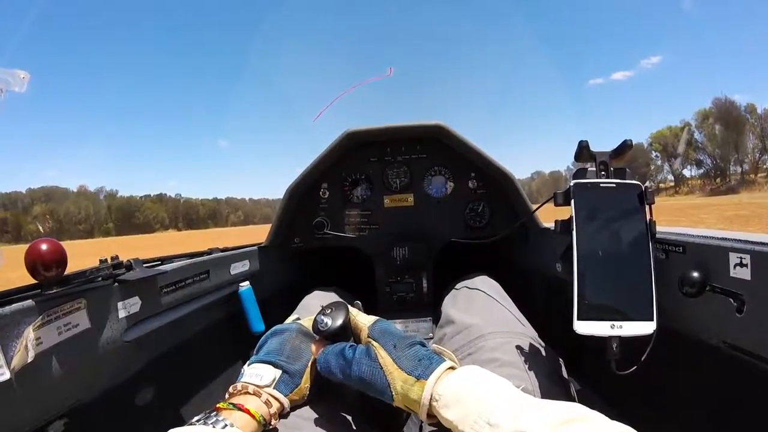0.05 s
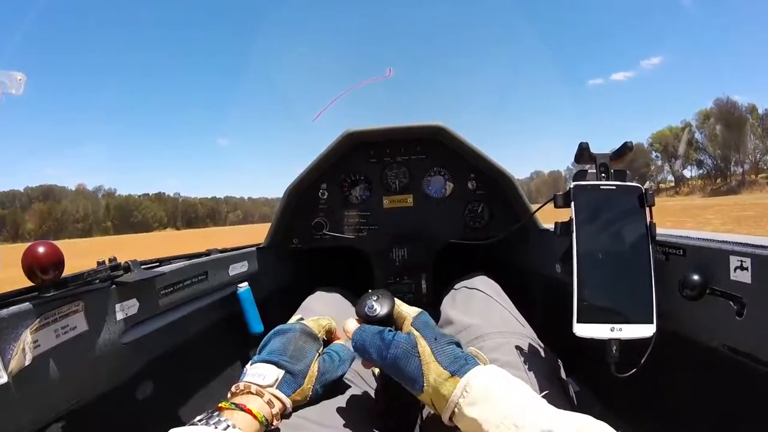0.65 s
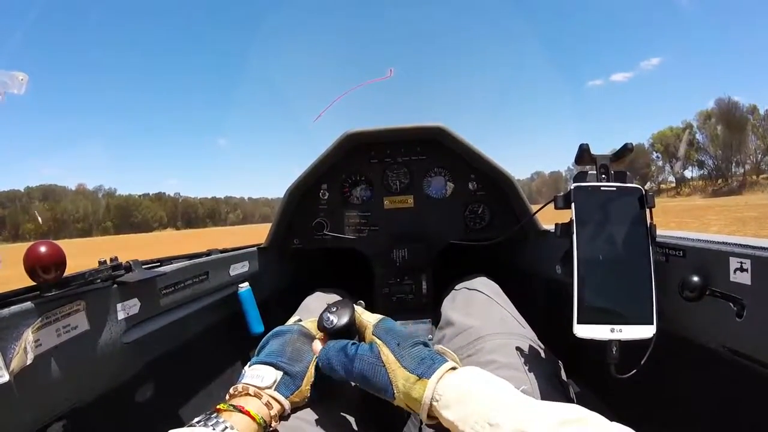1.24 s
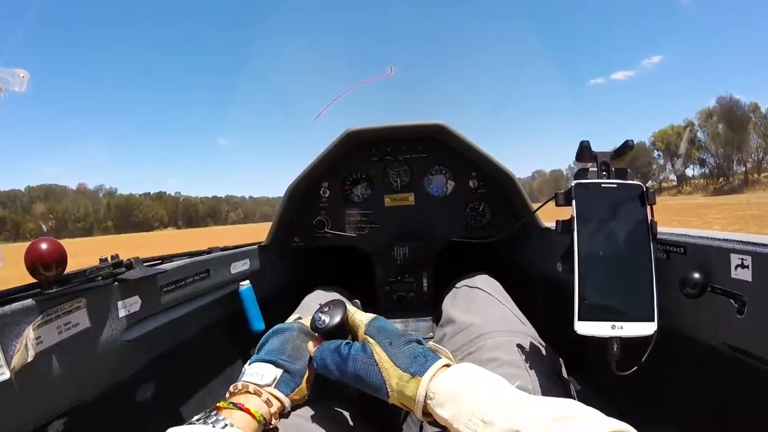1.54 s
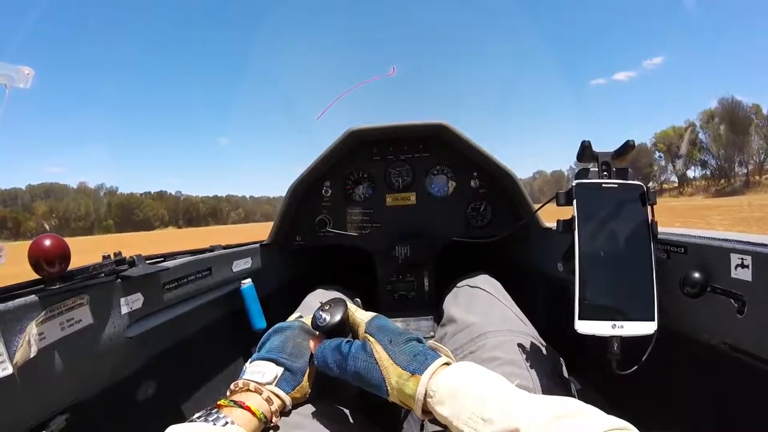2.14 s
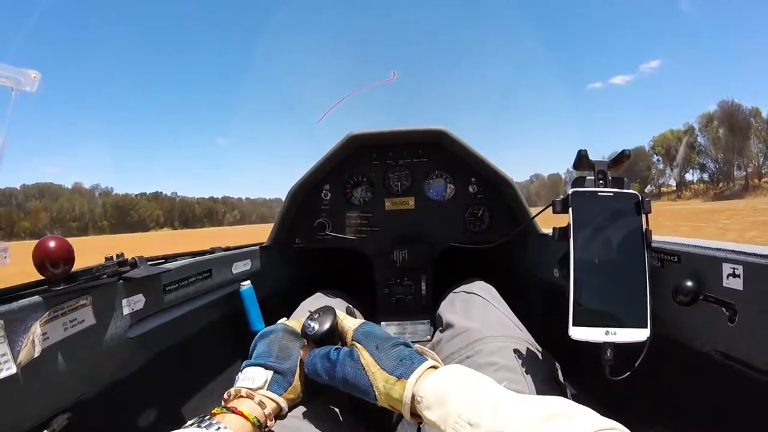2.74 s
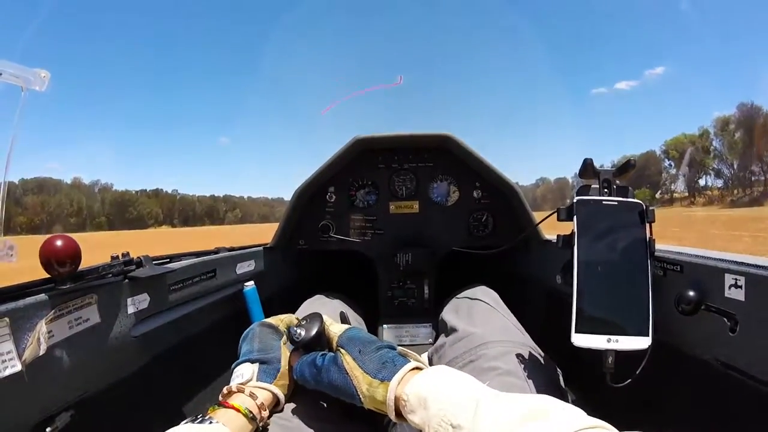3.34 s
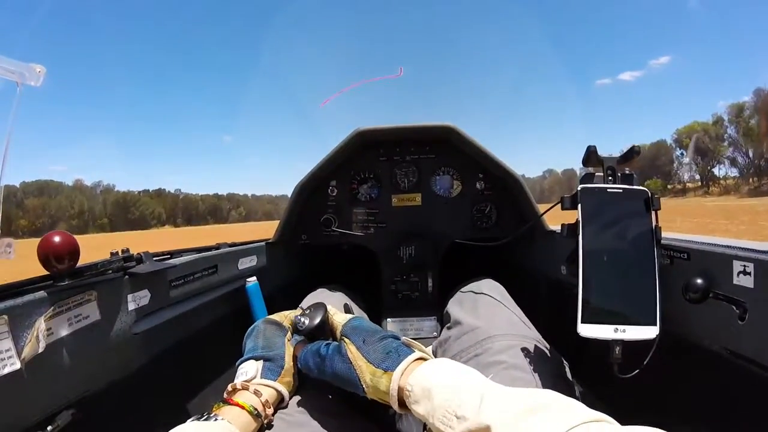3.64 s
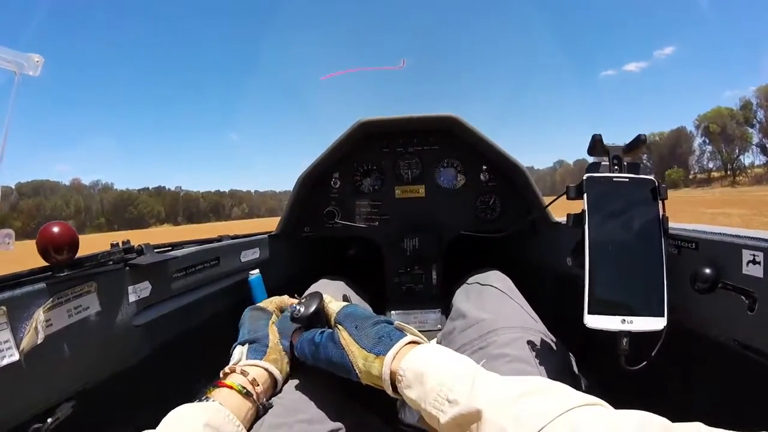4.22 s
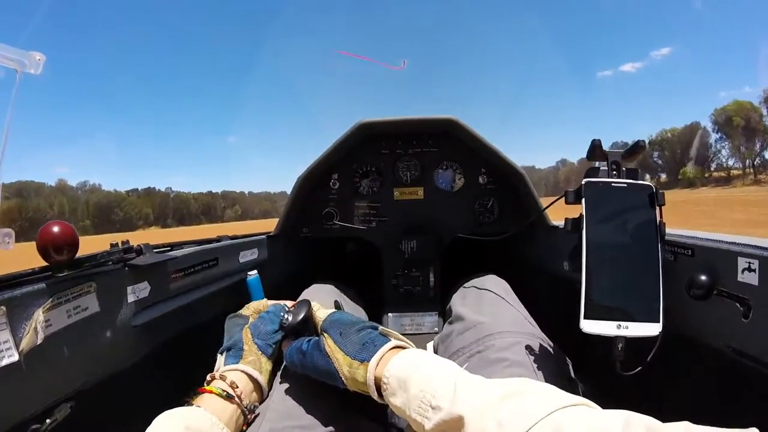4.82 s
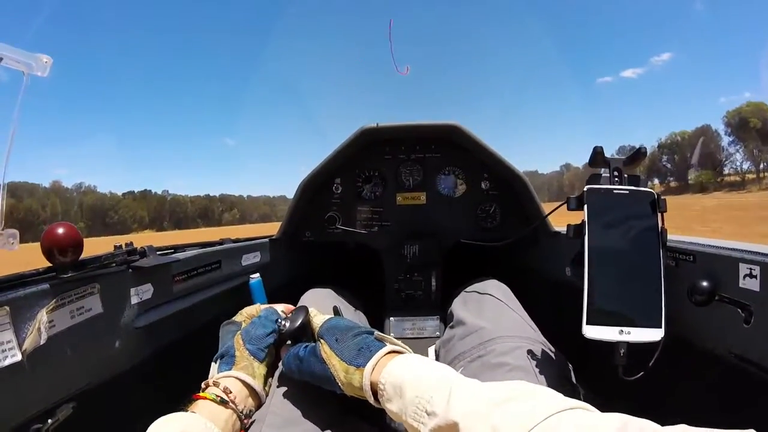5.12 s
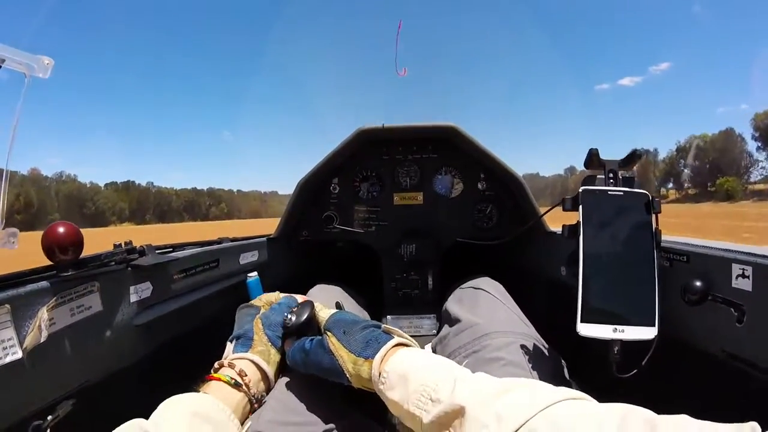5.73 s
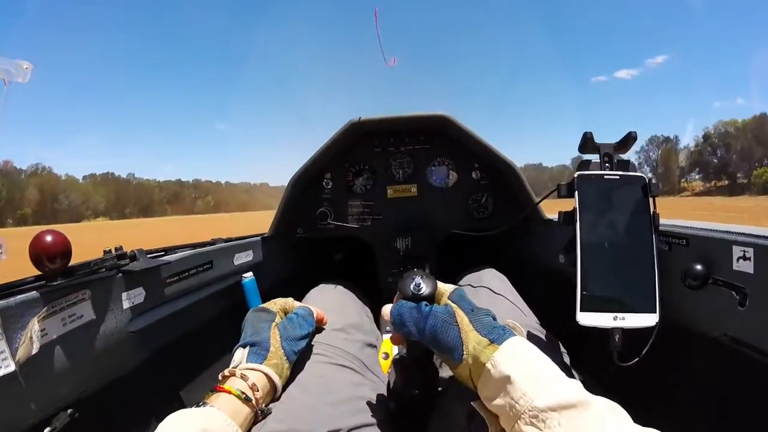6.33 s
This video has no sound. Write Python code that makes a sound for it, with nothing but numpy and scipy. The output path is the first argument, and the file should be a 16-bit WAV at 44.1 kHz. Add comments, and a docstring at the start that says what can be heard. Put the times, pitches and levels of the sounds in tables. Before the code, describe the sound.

Inside a glider's closed cockpit, soft thumps give way to hard knocks and a bumpy, booming roll across stubble.

```python
"""Soft thumps and creaks come first: a glider creeps over dry grass, heard inside its closed cockpit.
Its frame knocks sharply as it is pulled away for launch. Bumps under the wheel make the hollow body
boom ever louder, the stubble roars and rasps under the tyre, and loose fittings rattle and tick.
Behind it all are a breeze on the canopy, a soft hiss and a faint electronic whine."""
import sys
import numpy as np
from scipy import signal
from scipy.fft import rfft, irfft
from scipy.io import wavfile
from scipy.ndimage import uniform_filter1d

SR = 44100
rng = np.random.default_rng(int(sys.argv[2]) if len(sys.argv) > 2 else 0)


def unload_wav(signal):
    """Save mono or channel-first audio to the path in sys.argv[1] as 16-bit WAV at rate SR, clipped to [-1, 1]."""
    wavfile.write(
        sys.argv[1],
        SR,
        np.round(np.clip(np.atleast_2d(signal).T, -1, 1) * 32767).astype(np.int16),
    )


N = 285327
TIME = np.arange(N) / SR

# skips, where the wheel runs light and the roar drops: time_s, change_db
SKIPS = [(2.72, -3), (3.2, -6.5), (3.3, -4), (3.8, -3), (3.965, -4.5), (4.095, -6.5), (4.35, -4),
         (4.48, -2), (4.61, -3), (4.79, -4.5), (4.915, -4.5), (5.14, -4.5), (5.315, -5), (5.9, -3),
         (6.14, -4.5)]


def gain_of(db):
    """Turns decibels into a number to multiply a sound by."""
    return 10 ** (np.asarray(db) / 20)


def evened(x):
    """Scales a sound so that its average strength (rms) is 1."""
    return x / np.sqrt(np.mean(x ** 2) + 1e-20)


def steadied(x, size):
    """Holds a sound's strength near 1 over every stretch of size samples."""
    power = uniform_filter1d(uniform_filter1d(x ** 2, size), size)
    return x / np.sqrt(abs(power) + 1e-20)


def db_at(spectrum, hz):
    """Looks up levels between the (pitch_hz, level_db) points of a spectrum."""
    pitch_hz, level_db = np.transpose(spectrum)
    return np.interp(np.log(hz + 1), np.log(pitch_hz + 1), level_db)


def level(curve):
    """Joins (time_s, level_db) points into a level for every sample."""
    return np.interp(TIME, *np.transpose(curve))


def swells(events, half_s, column):
    """Turns one column of a table into smooth humps or dips around each row's time."""
    return sum(row[column] * np.exp(-((TIME - row[0]) / half_s) ** 2) for row in events)


def add(mix, start_s, sound):
    """Mixes a sound in at start_s."""
    part = mix[max(round(start_s * SR), 0):][:len(sound)]
    part += sound[:len(part)]


def wander(rate_hz):
    """A smooth random wobble, mostly slower than rate_hz."""
    hz = np.fft.rfftfreq(N, 1 / SR)
    return evened(irfft(rfft(rng.standard_normal(N)) * np.exp(-(hz / rate_hz) ** 2), N))


def grains(per_s, spread_db):
    """Tiny random hits, most small and a few large."""
    size = gain_of(spread_db * np.minimum(rng.exponential(1, N), 4))
    return evened(size * rng.choice([-1, 1], N) * (rng.random(N) < per_s / SR))


def shell(force, spectrum, lift=1, size=16384):
    """A force, shaped by the given spectrum, makes the glider's hollow body ring."""
    # pitches that the body and the cockpit air boost: pitch_hz, width_hz, boost_db
    resonances = [(13.2, 19, 3), (25.9, 4.7, 5.5), (41.34, 12.4, 15), (62.5, 36.6, 18), (113, 54, 11),
                  (129.2, 15, 5.5), (184.2, 31.5, 13.5), (224.2, 27, 6.5), (259, 33.3, 12.5), (329, 70, 11),
                  (410, 9.2, 6), (533, 40, 9), (759, 190, 6.5), (896, 20, 1.5), (1150, 140, 1.5),
                  (1243, 60, 8), (1633, 45, 8.5), (2257, 290, 7), (2950, 200, 8), (3153, 90, 10.5),
                  (3410, 76, 9.5), (3570, 52, 7), (4230, 77, 5), (4700, 360, 3.5)]
    hz = abs(np.fft.fftfreq(size, 1 / SR))
    boost_db = sum(db / (1 + (2 * (hz - pitch) / width) ** 2) for pitch, width, db in resonances)
    log_gain = (db_at(spectrum, hz) + lift * boost_db) * np.log(10) / 20
    ring = np.fft.ifft(np.exp(np.conj(signal.hilbert(log_gain)))).real  # rings only after the push
    fade = signal.windows.tukey(size)[size // 2:]
    return signal.fftconvolve(force, ring[:size // 2] * fade)[:len(force)]


def wheel_bumps(jolts, skips_db):
    """Clods rock and heave the frame, boom in the hollow body and sound its main note."""
    # how hard the ground shakes the frame: time_s, level_db
    shaking = [(0, -31.5), (0.62, -41), (1.05, -47.5), (1.75, -47), (2.27, -47), (2.62, -30.5), (2.85, -26),
               (3.02, -19), (3.2, -18), (3.35, -14.5), (3.58, -13.5), (3.86, -15.5), (4.2, -13),
               (4.92, -14.5), (5.52, -8.5), (5.72, -14), (5.87, -11.5), (6.47, -12.5)]
    # ruts and clods: time_s, extra_sway_db, extra_heave_db, extra_boom_db, extra_note_db
    bumps = [(0.04, 0, -4.5, -5, -6.5), (0.12, 4.5, -5, -14, -10), (0.24, 10.5, -14, -23, -20),
             (0.4, 6.5, -2, -1, -2), (0.61, 10, 4, -17, 2), (0.89, 6.5, 8, 2, 3), (1.1, 5.5, 11, 5, -4),
             (1.38, 1.5, 14, -4, -8), (1.61, 2, 8, -3, 5), (2.09, -1, 11, 9.5, -4), (2.38, 1, 14.5, -13, 0),
             (2.64, -3, 2.5, 1, -8), (2.77, 6.5, -3, -5, -18), (3.3, 2.5, 3, 4.5, -0.5),
             (3.51, -3, 0.5, 5, 4), (3.6, 0.5, 5.5, 2.5, 5.5), (3.77, 1.5, 5, 2.5, 4.5),
             (3.93, 3, 0.5, 4.5, -2), (4.02, 7, -0.5, 3, 7), (4.1, -1, -3.5, 3.5, -2),
             (4.17, 5, -4.5, -2, 7), (4.3, -6.5, 5, 0.5, 1), (4.42, -4.5, 2, 4, -0.5),
             (4.67, 5.5, 3.5, -3.5, 7.5), (4.82, -15, 8, -5, 8.5), (4.89, 0, 5, -6.5, -1),
             (5.09, -1, 3.5, -2.5, 5.5), (5.32, -5, 0, -1.5, -2.5), (5.42, 4, -1, -9, 7.5),
             (5.5, 2.5, -6, 1.5, -17.5), (5.56, -10, 3, -3.5, 3), (5.65, -11.5, -2, -2, 0.5),
             (5.79, 10.5, 0.5, -0.5, 5.5), (5.87, 4, 3, 0, 6), (6.04, 6, 4.5, 1, 4),
             (6.28, -10, 0.5, 4, -3), (6.41, 9.5, 8, 5, 6)]
    # brief dips and surges in the low rumble and the boom: time_s, sway_and_heave_db, boom_and_note_db
    dips_and_surges = [(0.16, -5, -5), (0.54, -6, -8), (0.75, -6, 7), (1.02, 0, -13), (1.21, -4, 8),
                       (1.29, -3, 7), (1.46, -19, 0), (1.49, -10, 0), (1.53, -17, 10.5), (1.71, -2, 2),
                       (1.77, -17, 3), (2.28, -7, 5), (2.45, -4, 10), (2.52, -4, 5.5), (2.71, -5, -2),
                       (2.85, -3, -3), (3.12, -4, -2.5), (3.18, 1.5, 0), (3.45, -6, -1.5), (3.7, 4.5, -2.5),
                       (4.57, 1, -2.5), (4.9, -0.5, 0), (5.68, 1, -3.5), (6.15, 1.5, 2.5)]
    # the frame's slow rocking: pitch_hz, level_db
    sway_spectrum = [(3, -21.5), (8, -1.5), (13, 4.5), (26, -7), (40, -28.5), (65, -39), (130, -59),
                     (400, -110)]
    # the wheel's slow up-and-down push: pitch_hz, level_db
    heave_spectrum = [(15, -33), (30, -7), (42, -2.5), (50, -4), (63, -1), (78, -5.5), (95, -7), (120, -8),
                      (150, -16), (300, -66), (900, -115)]
    # the hits that make the body boom: pitch_hz, level_db
    boom_spectrum = [(50, -31), (85, -16.5), (115, -5.5), (180, 0), (208, -11.5), (255, -13), (295, -20),
                     (345, -13), (400, -17), (520, -23.5), (900, -55), (2500, -110)]
    # the body's hollow main note: pitch_hz, level_db
    note_spectrum = [(120, -76.5), (190, -24), (228, -1.5), (258, 0), (280, -7.5), (310, -21), (500, -71.5)]
    sway = steadied(shell(rng.standard_normal(N), sway_spectrum), size=3000)
    heave = steadied(shell(rng.standard_normal(N), heave_spectrum), size=2500)
    boom = steadied(shell(grains(per_s=1500, spread_db=3.44), boom_spectrum), size=1600)
    note = steadied(shell(grains(per_s=1500, spread_db=1.8), note_spectrum), size=1200)

    speed = np.interp(TIME, [3.5, 3.89], [0, 1])  # faster hits reach the body's higher pitches
    wing_lift_db = 4.5 * np.maximum(TIME - 4.73, 0)  # the wings take weight off the wheel
    shake_db = level(shaking)
    sway_bumps, heave_bumps, boom_bumps, note_bumps = (
        swells(bumps, half_s=0.044, column=k) for k in (1, 2, 3, 4))
    rumble_swings, boom_swings = (swells(dips_and_surges, half_s=0.018, column=k) for k in (1, 2))
    # the sway grows less than the shaking does
    sway_db = -20 + 0.47 * (shake_db + 18.5) - wing_lift_db + rumble_swings + sway_bumps
    heave_db = -2 + shake_db - wing_lift_db + rumble_swings + heave_bumps
    boom_db = -9.5 + shake_db + 6 * speed + boom_swings + boom_bumps + 0.4 * skips_db + 0.53 * jolts
    note_db = -13.5 + shake_db + 2 * speed + boom_swings + note_bumps
    return (sway * gain_of(sway_db) + heave * gain_of(heave_db)
            + boom * gain_of(boom_db) + note * gain_of(note_db))


def stubble(jolts, skips_db):
    """The tyre roars over the stubble while stalks and grit rasp; each jolt stirs them."""
    # the tone of the tyre's roar: pitch_hz, level_db
    roar_spectrum = [(200, -34.5), (380, -3), (470, -5), (700, -2), (1000, -7), (1300, -10), (1550, -22),
                     (2000, -29.5), (2600, -35), (5000, -43.5), (9000, -87.5)]
    # how loud the roar is: time_s, level_db
    roar_curve = [(0, -62.5), (0.45, -61.5), (0.7, -55.5), (1.0, -64.5), (2.27, -64.5), (2.72, -54.5),
                  (2.93, -49.5), (3.08, -39.5), (3.24, -43.5), (3.36, -38.5), (3.55, -36), (4.45, -34),
                  (4.9, -35.5), (5.28, -35), (5.5, -31), (5.68, -36.5), (6.1, -33.5), (6.38, -32.5)]
    # the tone of dry stalks and grit: pitch_hz, level_db
    rasp_spectrum = [(900, -17.5), (1600, 9), (1850, 1), (2600, -6), (3500, -8.5), (3800, -11.5),
                     (5100, -14.5), (5900, -21), (7500, -24.5), (9500, -31.5), (11000, -54)]
    # their rasp, which sets in quickly as the glider picks up speed: time_s, level_db
    rasp_curve = [(2.3, -85), (2.98, -65), (3.11, -54.5), (3.19, -58.5), (3.315, -68), (3.335, -51),
                  (3.42, -51.5), (3.75, -49), (4.2, -48), (4.5, -49), (4.95, -50), (5.35, -52.5),
                  (5.52, -47), (5.66, -51), (6.1, -49), (6.4, -47.5)]
    roar = steadied(shell(grains(per_s=3500, spread_db=1.8), roar_spectrum), size=2000)
    rasp = steadied(shell(grains(per_s=7000, spread_db=0.66), rasp_spectrum), size=1500)
    roar_db = 0.72 + level(roar_curve) + skips_db + 1.5 * jolts
    rasp_db = level(rasp_curve) + 1.7 * skips_db + 2.5 * jolts
    return roar * gain_of(roar_db) + rasp * gain_of(rasp_db)


def cockpit_background(breeze_db=-52, hiss_db=-58.5):
    """A breeze on the canopy murmurs in the body, with an even hiss and a thin electronic whine."""
    # the breeze on the canopy: pitch_hz, level_db
    breeze_spectrum = [(40, -13), (105, 7.5), (180, -3.5), (250, -6.5), (330, -2.5), (450, -11),
                       (900, -26.5), (2000, -51), (5000, -80)]
    # the hiss of the still cockpit: pitch_hz, level_db
    hiss_spectrum = [(80, 2.5), (300, 16.5), (600, 11.5), (1000, 7), (2000, 3), (3000, 0), (4500, -3),
                     (6000, -6.5), (8000, -10.5), (9500, -11.5), (10500, -16), (12000, -21), (14000, -25)]
    # the tones of the whine: pitch_hz, level_db
    whine_tones = [(9410, -99), (9470, -101), (9530, -101), (9590, -93.5), (9650, -84.5)]
    breeze = evened(shell(rng.standard_normal(N), breeze_spectrum, lift=0.15))
    breeze *= gain_of(2 * wander(rate_hz=11))
    hiss_shape = gain_of(db_at(hiss_spectrum, np.fft.rfftfreq(N, 1 / SR)))
    hiss = evened(irfft(rfft(rng.standard_normal(N)) * hiss_shape, N))
    whine = sum(gain_of(db) * evened(np.sin(2 * np.pi * (hz * TIME + rng.random())))
                for hz, db in whine_tones)
    return gain_of(breeze_db) * breeze + gain_of(hiss_db) * hiss + whine


def panel_blows(echo=0.36, echo_fade_s=0.21):
    """A blow rings a panel: high notes speak first, then sink to a thud. Longer contact is duller."""
    # heavy blows on the panel: start_s, peak_db, contact_s
    blows = [(0.223, -39, 0.0017), (0.295, -36, 0.0048), (1.096, -34.5, 0.0044), (1.624, -45, 0.00086),
             (1.695, -49, 0.0014), (1.891, -32, 0.0037), (1.903, -24.5, 0.00477), (2.526, -11, 0.0011)]
    # the panel's own notes: pitch_hz, level_db, build_s, fade_s (time to fall by 60 dB)
    notes = [(178.7, -18, 0.0063, 0.16), (258.3, -10.5, 0.0065, 0.13), (325.4, -15, 0.011, 0.23),
             (406, -4.5, 0.011, 0.075), (467, -10, 0.0075, 0.09), (537, -4, 0.014, 0.11),
             (670, -6, 0.0027, 0.045), (759, -4, 0.011, 0.056), (926, -6, 0.002, 0.037),
             (1163, -1.5, 0.0022, 0.031), (1340, -22, 0.002, 0.05), (1670, -20, 0.002, 0.06),
             (2230, -8, 0.001, 0.045)]
    out, t = np.zeros(N), np.arange(SR // 3) / SR
    ring = np.zeros(len(t))
    for k, (hz, db, build_s, fade_s) in enumerate(notes):
        loudness = gain_of(db - 60 * t / fade_s) * (1 - np.exp(-(t / build_s) ** 2))
        ring += (-1) ** k * loudness * np.sin(2 * np.pi * hz * t)
    for start_s, peak_db, contact_s in blows:
        push = np.sin(np.pi * t[t < contact_s] / contact_s) ** 2
        sound = signal.fftconvolve(ring, push)
        echoes = rng.standard_normal(len(t)) * gain_of(-60 * t / echo_fade_s)  # these blur the ring
        sound += echo * signal.fftconvolve(sound, echoes / np.linalg.norm(echoes))[:len(sound)]
        add(out, start_s, gain_of(peak_db) * sound / abs(sound).max())
    return out


def frame_knocks(scatter=2.4, scatter_fade_s=0.035, tail=0.85, tail_fade_s=0.12, scuff_s=0.0051):
    """Slack parts scuff, then hit: a sharp click, a spray of close echoes and a short cockpit tail."""
    # knocks of the frame and its links: start_s, level_db, treble_db, bass_db, ring_factor, rise_s
    knocks = [(0.301, -47.5, -12, 3, 0.88, 0.0014), (0.410, -45, -10, 3, 3.2, 0.012),
              (0.462, -54, -10, -1, 1.2, 0.0057), (0.834, -46, -10, 11, 1.1, 0.011),
              (1.309, -45, -10, 6, 1.2, 0.003), (1.551, -38, -6, 3, 1.4, 0.013),
              (1.619, -41.5, -25, -6, 1.2, 0.0025), (1.623, -46, 12, 5, 1.1, 0.0022),
              (1.696, -44.5, 3, 3, 0.89, 0.0031), (1.893, -42.5, -12, 17, 1.9, 0.0031),
              (2.021, -45, -9, 15.5, 1.8, 0.0008), (2.34, -36, -12, 1.5, 1, 0.0026),
              (2.3466, -23, 0, -0.5, 1.2, 0.0013), (2.364, -19, 1.5, 1.5, 0.9, 0.0004),
              (2.368, -38, 15, -12, 2.3, 0.0012), (2.401, -37.5, -16, 5, 0.72, 0.005),
              (2.449, -25, -8, 3, 0.88, 0.0011), (2.526, -18.5, -8, -4.5, 0.62, 0.0013),
              (2.531, -19.5, -1.5, -9, 0.83, 0.00064), (2.616, -22.5, -7, -2.5, 0.95, 0.0011),
              (2.63, -32, 8, 9, 0.8, 0.0013), (2.642, -24.5, -14, -1, 0.56, 0.00084),
              (2.642, -34, 11, 0, 1.5, .001), (2.758, -32, -9, 10.5, 0.46, 0.004),
              (2.786, -39, 5, 3, 0.8, 0.0029), (2.833, -27, -15, -9, 0.45, 0.0093),
              (2.8808, -23.5, 0.5, 4, 1.45, 0.00064), (2.906, -32, -17, 10.5, 0.88, 0.0012),
              (2.96, -33, 0, 21, 1.1, 0.007), (2.978, -18.5, -4, -4, 0.7, 0.0026),
              (3.516, -28, -8, -6, 1.4, 0.0006), (3.583, -28, -11, -7, 0.9, 0.001),
              (4.843, -28.5, -2, -18.5, 0.5, 0.00055), (5.164, -26.5, -13, -0.5, 0.8, 0.00088),
              (5.255, -26, -2, 5, 0.74, 0.0014), (5.343, -32, -8.5, 4.5, 0.87, 0.0009),
              (5.454, -36.5, -3, 12, 1, 0.0017), (6.249, -29.5, -15, 5, 1.2, 0.0013),
              (6.345, -35, -14, 9, 1.2, .001), (6.379, -36, -1, 6, 1.5, 0.0031)]
    # the tone of a knock: pitch_hz, level_db
    knock_spectrum = [(60, -9), (115, 5.5), (190, -0.5), (300, -2.5), (480, -2.5), (750, 4.5), (1200, 1),
                      (1470, -8.5), (1680, -8.5), (1900, -13.5), (2200, -10), (2700, -18.5), (4900, -24),
                      (6300, -33), (9500, -43.5), (14000, -59)]
    out, t = np.zeros(N), np.arange(SR // 4) / SR
    bass_cut = signal.butter(2, 600, "high", fs=SR, output="sos")
    for start_s, level_db, treble_db, bass_db, ring_factor, rise_s in knocks:
        tone = [(250, bass_db), (700, 0), (1400, 0), (4500, treble_db)]
        spectrum = [(hz, db + db_at(tone, hz)) for hz, db in knock_spectrum]
        # seat and clothes soak up the tail's treble, and rubbing is softer than a hit
        muffled = [(hz, db + db_at([(900, 4.5), (4000, -5)], hz)) for hz, db in spectrum]
        dull = [(hz, db + db_at([(700, 0.5), (3000, -2.5)], hz)) for hz, db in spectrum]

        early, late, rub = rng.standard_normal((3, len(t))) * (1 - np.exp(-t / rise_s))
        early *= gain_of(-60 * t / scatter_fade_s / ring_factor)
        late *= gain_of(-60 * t / tail_fade_s / ring_factor)
        rub *= np.exp(-(t / scuff_s - 2) ** 2)
        strike = scatter * early / np.linalg.norm(early)
        add(strike, rise_s / 2, np.ones(1))  # the click itself
        hit = shell(strike, spectrum, lift=0.56) + shell(tail * late / np.linalg.norm(late), muffled)
        scuff = gain_of(-13) * shell(scatter * rub / np.linalg.norm(rub), dull)

        crack = signal.sosfilt(bass_cut, hit)  # its loudest 4 ms set the knock's strength
        strength = gain_of(level_db - 6) / np.sqrt(uniform_filter1d(crack ** 2, size=176).max())
        add(out, start_s, strength * hit)
        add(out, start_s - 0.95 * scuff_s, strength * scuff)
    return out


def fitting_ring(bright_db, pitch_factor=1):
    """A small metal part rings briefly, a larger one lower and longer; bright_db lifts high notes."""
    # the part's ringing notes, main note first: pitch_hz, level_db, rise_s
    notes = [(2936, 1.5, 0.0014), (2272, -8.5, 0.0014), (3820, -8, 0.00071), (5130, -17, 0.00084),
             (7280, -26, 0.0015)]
    t = pitch_factor * np.arange(SR // 30) / SR
    ring = np.zeros(len(t))
    for hz, db, rise_s in notes:
        octaves = np.log2(hz / notes[0][0])
        swell = (t / rise_s * np.exp(1 - t / rise_s)) ** 2
        ring += gain_of(db + bright_db * octaves) * swell * np.sin(2 * np.pi * hz * t)
    return ring


def fitting_ticks():
    """Loose fittings give single dry taps, each with its own pitch and hardness."""
    # the taps: start_s, level_db, pitch_factor, brightness_db_per_octave
    taps = [(1.31, -50.5, 0.425, -7), (1.627, -58, 1.4, -4), (4.314, -38, 1, -3), (4.5732, -32, 0.99, 0.5),
            (4.816, -58, 0.99, 16), (4.831, -66, 1.15, 20), (4.845, -38.5, 0.52, -2), (4.889, -38, 0.97, 4),
            (5.073, -56, 1.1, 23), (5.188, -43, 0.99, 4), (5.542, -39.5, 0.94, 1), (5.73, -41, 1.06, -3.5),
            (5.596, -43, 0.74, 11), (6.203, -36.5, 1, 3)]
    out = np.zeros(N)
    for start_s, level_db, pitch_factor, bright_db in taps:
        add(out, start_s, gain_of(level_db + 1) * fitting_ring(bright_db, pitch_factor))
    return out


def fitting_clatter():
    """Hard bumps shake the fittings into short showers of ringing clicks and a dry rasp."""
    # bursts of clatter: start_s, level_db, length_s
    bursts = [(3.687, -61, .02), (3.827, -57, 0.04), (3.87, -60, .018), (3.998, -67, 0.06),
              (4.122, -53, 0.05), (4.278, -62, 0.022), (4.437, -54, 0.016), (4.726, -56, .03),
              (4.807, -52, 0.015), (4.844, -54.5, 0.014), (5.056, -49, 0.03), (5.23, -56.5, 0.035),
              (5.385, -57, 0.028), (5.45, -52.5, 0.027), (5.551, -49.5, 0.039), (5.592, -50, 0.0084),
              (6.009, -50, 0.026), (6.084, -55, 0.056), (6.178, -51, 0.058), (6.247, -56.5, 0.074),
              (6.356, -50, 0.079)]
    # the tone of their rasp: pitch_hz, level_db
    rasp_spectrum = [(700, -27), (1500, -2.5), (3000, -2), (4200, -1.5), (6000, -5.5), (7400, -9),
                     (9500, -15.5), (11000, -46)]
    shake = np.zeros(N)
    for start_s, level_db, length_s in bursts:
        age = np.maximum(TIME - start_s, 0) / length_s
        shake += gain_of(level_db) * (1 - np.exp(-20 * age)) * np.exp(-age ** 2)
    clicks = grains(per_s=420, spread_db=4.1)
    ring = steadied(signal.fftconvolve(clicks, fitting_ring(bright_db=11.5))[:N], size=1000)
    rasp = steadied(shell(grains(per_s=800, spread_db=4.5), rasp_spectrum, lift=0.39), size=1000)
    return shake * (gain_of(-2) * ring + gain_of(-3) * rasp)


def scene():
    """Everything as heard from the pilot's seat, in one channel."""
    jolts = wander(rate_hz=81)
    skips_db = swells(SKIPS, half_s=0.029, column=1)
    rolling = wheel_bumps(jolts, skips_db) + stubble(jolts, skips_db)
    mix = rolling + cockpit_background() + panel_blows() + frame_knocks()
    return (mix + fitting_ticks() + fitting_clatter())[None]


def record(dry, ceiling=0.83, top_hz=13000):
    """Softly rounds off the loudest bumps, then cuts the treble above top_hz."""
    rounded = dry / (1 + (dry / ceiling) ** 8) ** (1 / 8)
    treble_cut = signal.firwin(511, top_hz, window=("kaiser", 9), fs=SR)
    return signal.oaconvolve(rounded, treble_cut[None], "same")


dry = scene()
out = record(dry)
unload_wav(out)
```